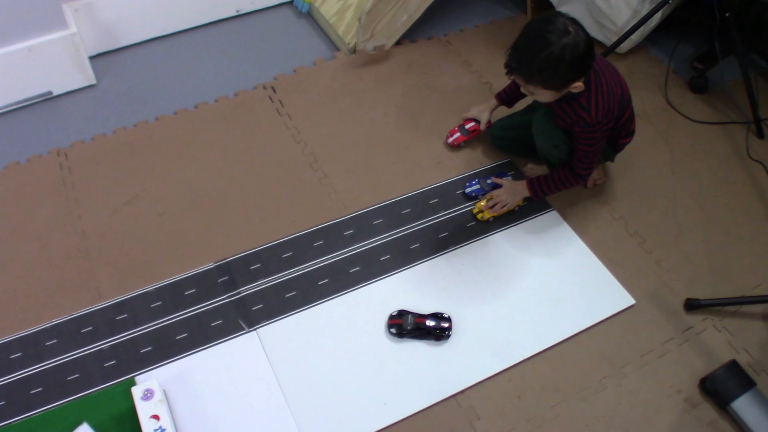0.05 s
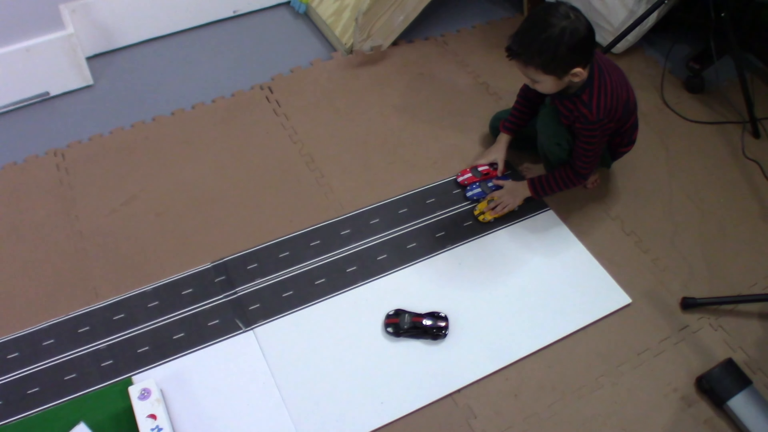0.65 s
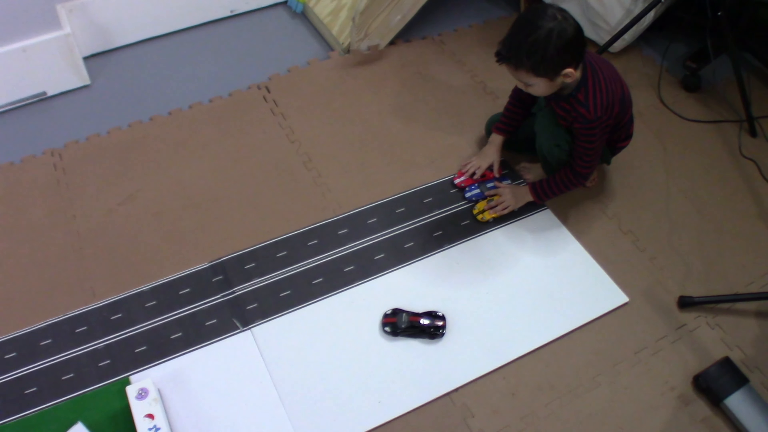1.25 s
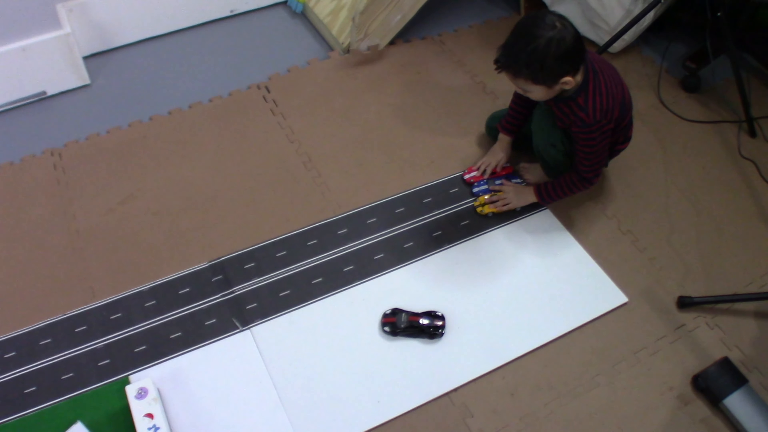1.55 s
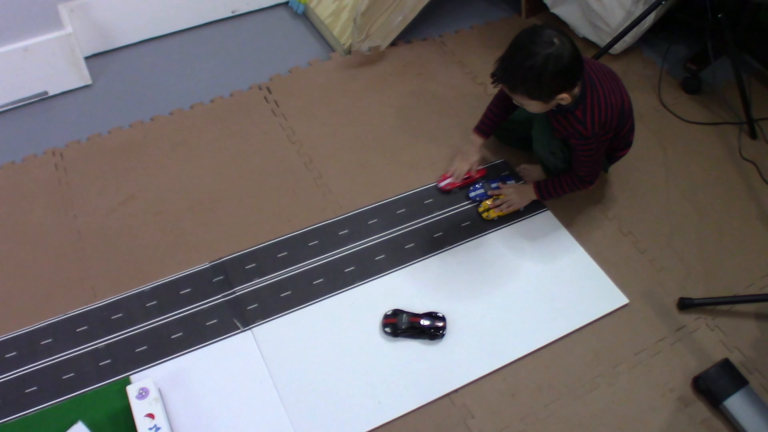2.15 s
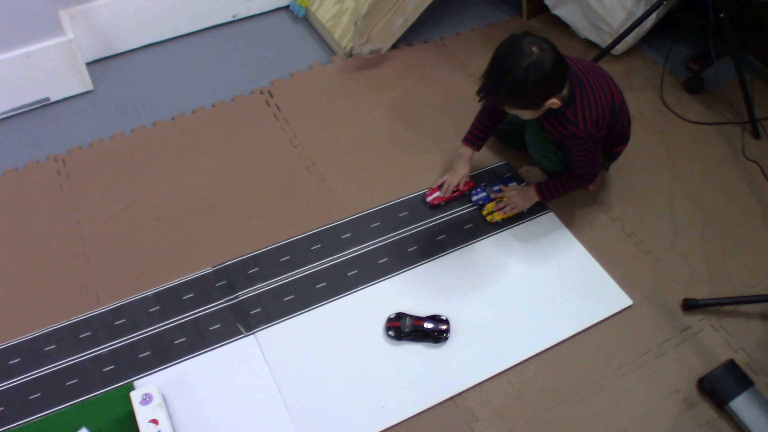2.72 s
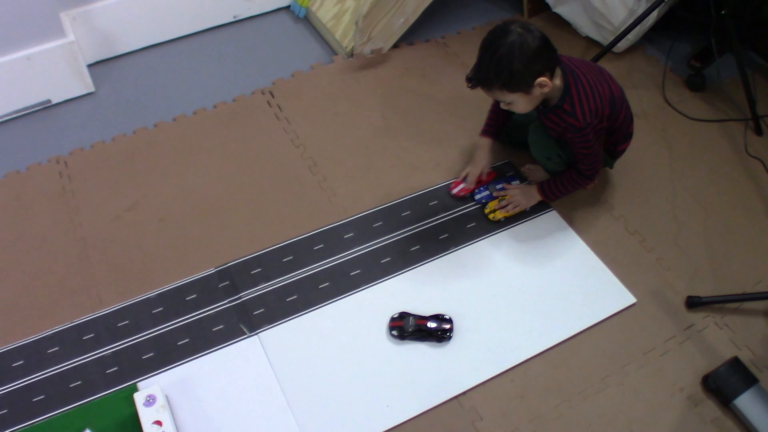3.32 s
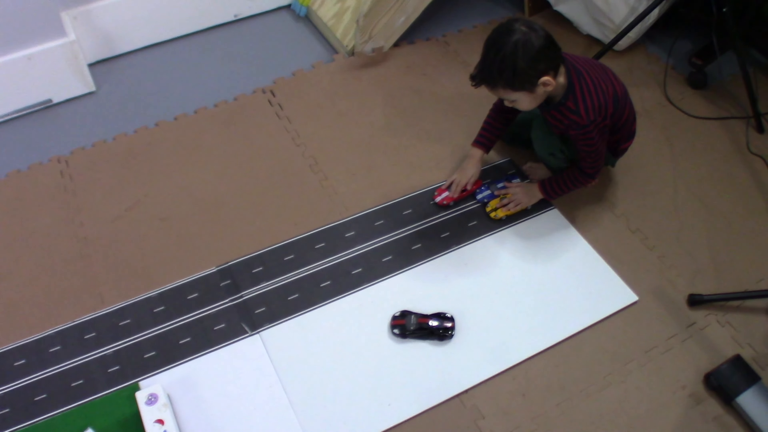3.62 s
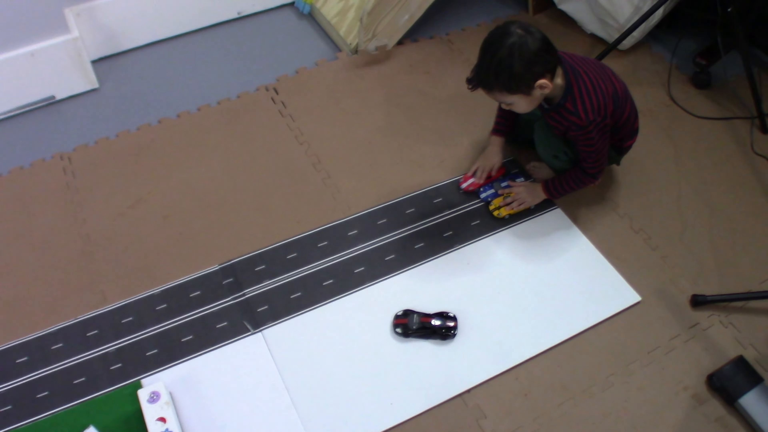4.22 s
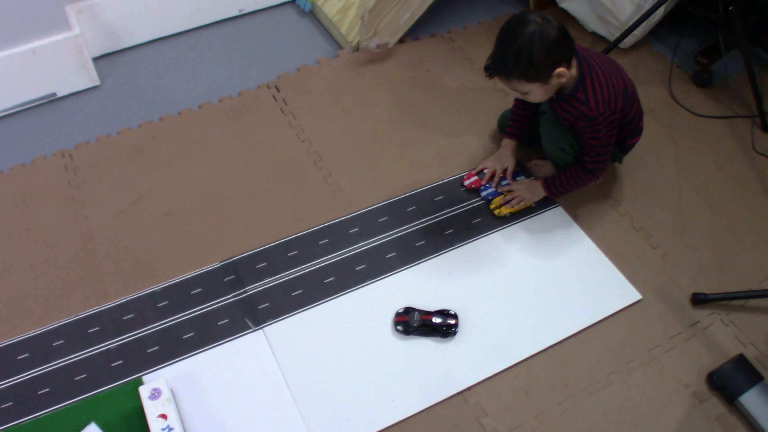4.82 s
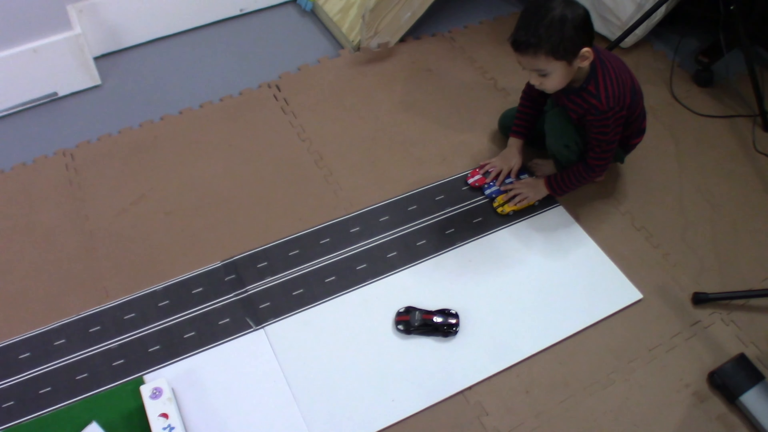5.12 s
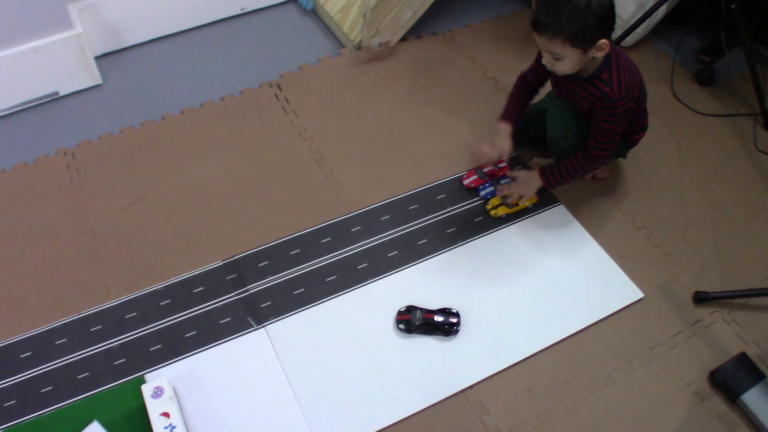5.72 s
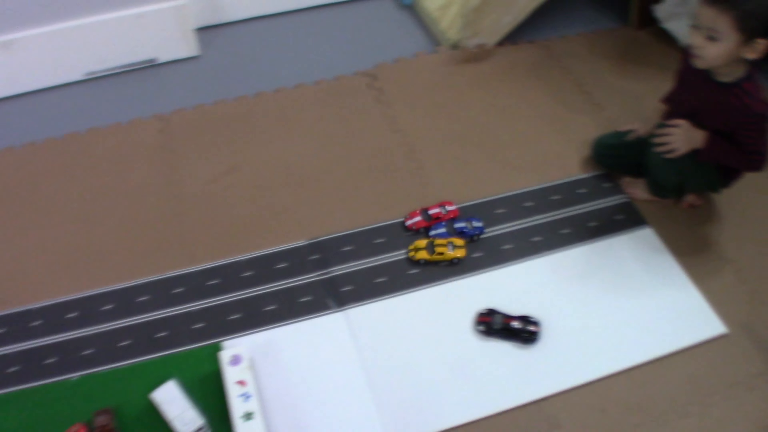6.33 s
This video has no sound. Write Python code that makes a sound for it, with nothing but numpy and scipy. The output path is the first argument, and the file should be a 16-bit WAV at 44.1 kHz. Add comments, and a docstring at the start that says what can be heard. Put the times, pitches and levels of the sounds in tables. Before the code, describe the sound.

Small metal toy cars click and clink as a hand lines them up, then roll along a board over a low hum.

```python
"""A small room, with a board track on the floor: a child lines up die-cast toy cars, then pushes them off.
Each knock rings chassis, metal shell, axles and board, and loose parts clatter after it. Hard wheels
rumble over the grain, dry axles squeak and a free wheel whines, over the low hum of ventilation.
One microphone feeds the left channel; the right holds only leakage, mains hum and hiss."""
import sys
import numpy as np
from scipy import signal
from scipy.fft import rfft, irfft, next_fast_len
from scipy.io import wavfile
from scipy.ndimage import uniform_filter1d

SR = 44100
rng = np.random.default_rng(int(sys.argv[2]) if len(sys.argv) > 2 else 0)


def generate_wav(sig):
    """Save sig (samples, or channels by samples) to the path in sys.argv[1] as 16-bit PCM at SR."""
    pcm = np.round(np.clip(np.atleast_2d(sig).T, -1, 1) * 32767).astype(np.int16)
    wavfile.write(sys.argv[1], SR, pcm)


N = 285309
TIME = np.arange(N) / SR
PADDED = next_fast_len(N, real=True)
HZ = np.arange(PADDED // 2 + 1) * SR / PADDED

# a car is set down or knocks against its neighbour:
# (time [s], level [dB], relative shell ring [dB], hardness [dB], clatter length [s])
CONTACTS = [(0.034, -28.5, -12, -2.5, 0.08), (0.084, -27.5, 6, -4.5, 0.064), (0.297, -32, 7.5, -7, 0.028),
            (0.41, -14, -2.5, 0.5, 0.013), (0.429, -9.5, -29, 0, 0.027), (0.557, -31.5, 1, -5, 0.027),
            (0.814, -18.5, -8, 1, 0.0066), (0.954, -39, 6, -6, 0.025), (1.165, -33, -1, -1, 0.022),
            (1.285, -27, -3, -3, .02), (1.301, -19, -9, 0.5, 0.021), (1.374, -30.5, 7, -7, 0.022),
            (1.480, -21, -5, -9, 0.033), (1.497, -5.5, -24, -2, 0.01), (1.505, -13, -11, 4.5, 0.01),
            (1.638, -26.5, -5, -3.5, 0.06), (1.725, -15, -6.5, -2, 0.043), (2.553, -15.5, 0.5, -2, 0.012),
            (2.762, -26.5, -2, -3, 0.01), (2.842, -4, -11.5, -3.5, 0.012), (3.624, -12.5, -3.5, -6, 0.032),
            (3.652, -18, -13, -0.5, 0.016), (3.738, -17, -5, -3.5, 0.061), (3.815, -2.5, -1.5, -2, 0.023),
            (3.836, -8, -5, 6, .018), (3.86, -4, -11, 1.5, 0.012), (3.898, -13, -28, 4, 0.012),
            (3.905, -0.5, -19, 1.5, 0.0075), (4.006, -9, -7, 3.5, 0.013), (4.058, -13, -6.5, -1, 0.025),
            (4.252, 0.5, -7.5, 1.5, 0.0066), (4.279, -2.5, 7, 3.5, 0.0094), (4.303, -3, -5, 3, 0.016),
            (4.337, -1, -23, 3.5, 0.0061), (4.611, -18, -8, 0.5, 0.029), (5.056, -36, -8, -4, 0.022),
            (5.116, -39, 7, -7, 0.021), (5.733, -18.5, -5, 3, 0.016), (5.806, -15.5, -16, -3, 0.049),
            (5.844, -19.5, -0.5, -2, 0.029)]


def car_knocks(chassis_db, shell_db, board_db, axles_db, spot_count):
    """The same blows ring chassis, shell, board and axles; contacts take turns on the spots, a row each."""
    # resonances of chassis and wheels: (frequency [Hz], level [dB])
    chassis_modes = [(2200, -5), (2690, 1.5), (3100, 2.5), (3570, 2), (4100, -0.5), (4750, -1.5),
                     (5500, -5), (6400, -28.5)]
    # ring of the cast metal shell: (frequency [Hz], width [Hz], level [dB])
    shell_modes = [(2014, 330, -6.5), (2146, 60, 5.5), (2440, 126, -1.5), (2541, 12, -7), (2610, 110, -5),
                   (2800, 31, -7), (2923, 48, -0.5), (2970, 49, 3.5)]
    # thud of the track board: (frequency [Hz], level [dB])
    board_modes = [(480, -6), (796, 0.5), (1030, -1), (1306, 5.5), (1640, 5)]
    # tick of axles and small parts: (frequency [Hz], level [dB])
    axle_modes = [(5800, 8.5), (6900, 6.5), (8400, 3), (10200, 0.5), (12300, 0.5), (14600, -6)]
    _, level_db, ring_db, hardness_db, _ = np.transpose(CONTACTS)
    onsets, sizes = clatter(rebound_count=14)
    chassis = struck(damped(chassis_modes, loss=0.23), band_hz=(1920, 5250))
    shell = struck(shell_modes, band_hz=(1780, 5450))
    board = struck(damped(board_modes, loss=0.2), band_hz=(400, 1430))
    axles = struck(damped(axle_modes, loss=0.12), band_hz=(4400, 19845))
    muted_db = 0.29 * np.minimum(level_db + 10, 0)   # the hand mutes the shell unless it is knocked hard
    yield_db = -12.5   # above this the board gives way and takes only a share of the extra force
    thud_db = np.minimum(level_db, yield_db + 0.41 * (level_db - yield_db))
    # hard contacts, metal on metal, thud less and tick more than wheels on the board
    parts = [(chassis, level_db + chassis_db),
             (shell, level_db + ring_db + muted_db + shell_db),
             (board, thud_db - 0.75 * hardness_db + board_db),
             (axles, level_db + hardness_db + axles_db)]
    spots = np.zeros((spot_count, N))
    for responses, part_db in parts:
        for k, response in enumerate(responses):
            for i, size in zip(onsets[k], sizes[k]):
                spots[k % spot_count, i:i + len(response)] += size * from_db(part_db[k]) * response[:N - i]
    return spots


def clatter(rebound_count):
    """A corner grazes, the car lands, loose parts rebound unevenly: (onsets in samples, sizes)."""
    graze_lead_s, bounce_s = .005, .005
    start, level_db, *_, length = np.transpose(CONTACTS)
    spacing, sign = rng.random((len(start), 2, rebound_count)).transpose(1, 0, 2)
    delays = np.cumsum(bounce_s * (.5 + spacing), axis=1)
    fall_db = 15 * (delays / length[:, None]) ** 1.65   # holds up at first, then drops as the parts settle
    rebounds = from_db(-4.5 - fall_db) * np.sign(sign - .5)
    graze = from_db(np.minimum(-10, -28 - level_db))   # stays faint even ahead of a hard knock
    times = np.column_stack([start - graze_lead_s, start, start[:, None] + delays])
    sizes = np.column_stack([graze, np.ones(len(start)), rebounds])
    return (times * SR).astype(int), sizes


def struck(modes, band_hz):
    """One ring per contact: each striking point gives slightly different mode pitches and strengths."""
    vary_db, detune = 1.5, .012
    band = signal.butter(3, band_hz, "band", fs=SR, output="sos")
    hz, width, db = np.transpose(modes)
    responses = []
    for pitch, strength in rng.uniform(-1, 1, (len(CONTACTS), 2, len(modes))):
        varied = zip(hz * (1 + detune * pitch), width, db + vary_db * strength)
        responses.append(unit_energy(signal.sosfilt(band, body(varied, SR // 10))))
    return responses


def damped(modes, loss):
    """Held parts die fast: each mode gets a width that is a share of its frequency."""
    return [(hz, loss * hz, db) for hz, db in modes]


def body(modes, length=SR // 2):
    """A resonant body rings as damped sines of alternating sign; wider modes die sooner."""
    t = TIME[:length]
    rings = [(-1) ** k * width * from_db(db) * np.exp(-np.pi * width * t) * np.cos(2 * np.pi * hz * t)
             for k, (hz, width, db) in enumerate(modes)]
    return unit_energy(sum(rings))


def rolling(bumps_per_s, spread_db, gain_db):
    """Small hard wheels hit uneven bumps in the grain of the track: a rumble with bright grit on top."""
    # tone of the rolling wheels: (frequency [Hz], level [dB])
    rumble_spectrum = [(260, -16), (450, 1), (526, -4.5), (662, -1.5), (812, -1.5), (1120, -4.5),
                       (1650, -0.5), (1890, 4), (2460, 4), (2740, 3), (3360, 4), (4710, -4), (8000, -27.5),
                       (10400, -35), (17600, -120)]
    grit_spectrum = [(2500, -26), (5500, 9.0), (8000, 2), (13000, 2.5), (16000, -8)]
    sizes = from_db(spread_db * np.minimum(rng.exponential(1, N), 4)) * rng.choice([-1, 1], N)
    bumps = sizes * (rng.random(N) < bumps_per_s / SR)
    rumble, grit = car_motion()
    wheels = rumble * coloured(bumps, rumble_spectrum) + grit * coloured(bumps, grit_spectrum)
    return from_db(gain_db) * wheels


def car_motion():
    """Envelopes of rumble and grit: a swell for each stroke of the hand, and the final free run."""
    # the hand moves a car to and fro: (start [s], length [s], level [dB], relative grit [dB])
    strokes = [(0.858, .30, -53.5, -24), (1.875, 0.22, -39.5, -7.5), (2.09, 0.28, -46.5, -14.5),
               (2.336, 0.29, -38.5, -8.5), (2.603, 0.19, -39.5, -21), (2.903, 0.17, -37.5, -8),
               (3.128, 0.12, -42, -17), (3.278, .21, -37, -8), (3.568, 0.046, -37.5, -19),
               (3.792, 0.034, -30.5, -12), (4.179, 0.074, -37, -13), (5.942, 0.047, -43, -12)]
    # after the last push the cars roll towards the microphone: the level climbs, then holds
    push_s, hold_s, fade_in_s, rise_db_per_s = 5.848, 6.288, 0.037, 30.5
    run_s = np.clip(TIME, push_s, hold_s) - push_s
    rumble = from_db(-42 + rise_db_per_s * run_s) * np.minimum(run_s / fade_in_s, 1)
    grit = rumble * from_db(-21)
    for start, length, level_db, grit_db in strokes:
        speed = swell(start, length)
        stroke = from_db(level_db) * speed ** 0.31
        rumble += stroke
        grit += stroke * speed * from_db(grit_db)   # faster is brighter
    return rumble, grit


def travelling(x, spots_per_s, spot_count):
    """A moving car fades from one spot of the track to the next at constant power; one row per spot."""
    position = (spots_per_s * TIME - np.arange(spot_count)[:, None]) % spot_count
    distance = np.abs(position - spot_count / 2)
    return x * np.sqrt(np.maximum(1 - distance, 0))


def axle_squeaks():
    """A wheel sticks and slips on its dry axle: one short whistle each time."""
    # whistles of the axles: (start [s], length [s], pitch [Hz], level [dB])
    squeaks = [(2.425, .05, 13000, -43), (2.932, .04, 12500, -42), (3.066, .024, 3600, -35)]
    return sum(from_db(db) * swell(start, length) ** 2 * np.sin(2 * np.pi * hz * TIME)
               for start, length, hz, db in squeaks)


def wheel_whine(start_s, length_s, level_db):
    """A wheel of a lifted car spins on, rubbing its axle and keeping a few resonances singing."""
    # resonances of the free wheel: (frequency [Hz], width [Hz], level [dB])
    wheel_modes = [(2000, 66, 6), (3900, 280, 0), (5170, 160, -5), (7800, 180, -13)]
    singing = rms_one(through(rng.standard_normal(N), body(wheel_modes)))
    return from_db(level_db) * swell(start_s, length_s) * singing


def ventilation(air_db, boom_db, hum_hz, hum_db):
    """A soft rush of air, narrow booms of the room and the steady tone of a motor."""
    # rush of the air: (frequency [Hz], level [dB])
    air_spectrum = [(20, -20.5), (34, -9), (75, -22), (100, -6.5), (160, -10.5), (250, -12), (350, -16),
                    (450, -24), (900, -29.5), (2200, -36.5), (3400, -37), (6000, -50), (10000, -56),
                    (16000, -67)]
    # room resonances stirred by the ventilation: (frequency [Hz], width [Hz], level [dB])
    room_modes = [(57.7, 7.8, -6.5), (125.25, 7.1, 2.5), (140.3, 15.6, -4.5), (204.3, 5.1, -15),
                  (322.9, 4.5, -8.5)]
    air = coloured(rng.standard_normal(N), air_spectrum)
    boom_spectrum = rfft(rng.standard_normal(PADDED)) * rfft(body(room_modes), PADDED)
    booms = rms_one(irfft(boom_spectrum, PADDED)[:N])
    motor = rms_one(np.sin(2 * np.pi * hum_hz * TIME))
    return from_db(air_db) * air + from_db(boom_db) * booms + from_db(hum_db) * motor


def room(diffuse_db, build_s, direct_db, shade_hz, scatter_s):
    """Direct sound dulled by the covering hand, scattered echoes and a tail whose top dies sooner."""
    # time the tail takes to fall by 60 dB: (frequency [Hz], decay time [s])
    decay_times = [(300, 0.32), (1200, 0.29), (3000, 0.29), (6000, 0.31), (14000, 0.2)]
    # echoes off the floor and near walls: (delay [s], level [dB])
    echoes = [(.0012, -6), (.0045, -0.5), (.0059, -2), (0.0113, 1), (.018, -13.5)]
    t = TIME[:SR // 2]
    tail = np.zeros(len(t))
    edges = np.geomspace(150, 19000, 11)
    for low, high in zip(edges, edges[1:]):
        band = signal.butter(2, [low, high], "band", fs=SR, output="sos")
        decay = np.exp(-np.log(1000) * t / at_hz(decay_times, np.sqrt(low * high)))
        tail += signal.sosfilt(band, rng.standard_normal(len(t))) * decay
    response = from_db(diffuse_db) * unit_energy(tail * (1 - np.exp(-t / build_s)))
    shade = signal.butter(2, shade_hz, fs=SR, output="sos")
    response += from_db(direct_db) * signal.sosfilt(shade, (t == 0) + 1e-18)
    for delay, db in echoes:
        scattered = rng.standard_normal(len(t)) * (t >= delay) * np.exp(-np.abs(t - delay) / scatter_s)
        response += from_db(db) * unit_energy(scattered)
    return unit_energy(response)


def open_channel(live, leak_db, leak_treble_db, leak_bass_db, hiss_db):
    """The unused input picks up a trace of its neighbour, mains hum and its own noise."""
    # harmonics of the mains hum: (frequency [Hz], rms level [dB])
    mains = [(60, -59), (120, -64), (180, -68), (300, -75.5), (540, -81)]
    treble = np.diff(live, prepend=0)
    bass = signal.sosfilt(signal.butter(2, 110, fs=SR, output="sos"), live)
    leak = from_db(leak_db) * live + from_db(leak_treble_db) * treble + from_db(leak_bass_db) * bass
    hum = sum(from_db(db) * rms_one(np.sin(2 * np.pi * (hz * TIME + rng.random()))) for hz, db in mains)
    hiss = coloured(rng.standard_normal(N), [(30, 4), (300, 3), (1000, 1.5), (16000, -3.5)])
    return leak + hum + from_db(hiss_db) * hiss


def limiter(x, threshold_db, release_db_per_s):
    """Loud peaks turn the gain down within a fraction of a millisecond; it recovers steadily."""
    over_db = np.maximum(20 * np.log10(np.abs(x) + 1e-9) - threshold_db, 0)
    recovery_db = release_db_per_s * TIME
    reduction_db = np.maximum.accumulate(over_db + recovery_db) - recovery_db
    return x * from_db(-uniform_filter1d(reduction_db, size=16))


def swell(start, length):
    """A movement speeds up from rest and slows down again: half a sine."""
    return np.sin(np.pi * np.clip((TIME - start) / length, 0, 1))


def from_db(db):
    """Decibels to gain."""
    return 10 ** (np.asarray(db) / 20)


def rms_one(x):
    """Scale to an rms of 1."""
    return x / np.sqrt(np.mean(x ** 2) + 1e-20)


def unit_energy(x):
    """Scale an impulse response so that it passes the power of white noise unchanged."""
    return x / np.sqrt(np.sum(x ** 2) + 1e-20)


def at_hz(points, hz):
    """Read a table on a log-frequency axis."""
    freq, value = np.transpose(points)
    return np.interp(np.log(np.maximum(hz, 1)), np.log(freq), value)


def coloured(x, spectrum):
    """Shape a steady sound with a curve of (frequency [Hz], level [dB]); rms 1."""
    return rms_one(irfft(rfft(x, PADDED) * from_db(at_hz(spectrum, HZ)), PADDED)[:N])


def through(x, response):
    """Pass a sound through an impulse response."""
    return signal.oaconvolve(x, response)[:N]


def scene():
    """Cars and room as they reach the single microphone; every spot on the track has its own echoes."""
    wheels = rolling(bumps_per_s=630, spread_db=3.5, gain_db=5.0)
    spots = car_knocks(chassis_db=21.0, shell_db=23.0, board_db=12.0, axles_db=11.5, spot_count=6)
    moving = wheels + axle_squeaks() + wheel_whine(start_s=.02, length_s=.45, level_db=-43)
    spots += travelling(moving, spots_per_s=16, spot_count=len(spots))
    sound = ventilation(air_db=-30.5, boom_db=-26.5, hum_hz=117.8, hum_db=-31.0)
    for spot in spots:
        response = room(diffuse_db=5.0, build_s=0.0012, direct_db=3.0, shade_hz=4400, scatter_s=0.0018)
        sound += through(spot, response)
    return np.array([sound, np.zeros(N)])


def record(dry):
    """Left: the hardest clashes are limited and rounded. Right: the open input. Both are cut at 16 kHz."""
    limited = limiter(dry[0], threshold_db=1.0, release_db_per_s=55.5)
    left = limited / (1 + limited ** 6) ** (1 / 6)   # soft clip
    right = open_channel(dry[0], leak_db=-50.0, leak_treble_db=-39.5, leak_bass_db=-31.0, hiss_db=-62.0)
    top_cut = signal.ellip(10, .2, 80, 16000, fs=SR, output="sos")
    return signal.sosfilt(top_cut, np.array([left, right]))


dry = scene()
out = record(dry)
generate_wav(out)
```